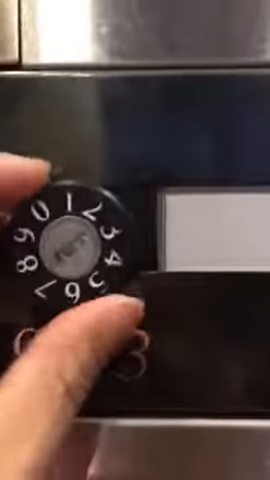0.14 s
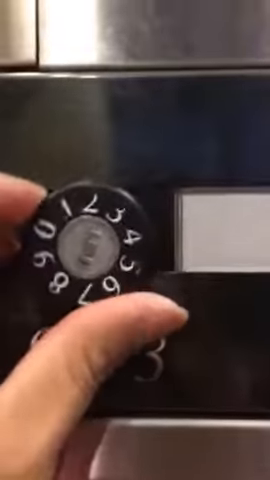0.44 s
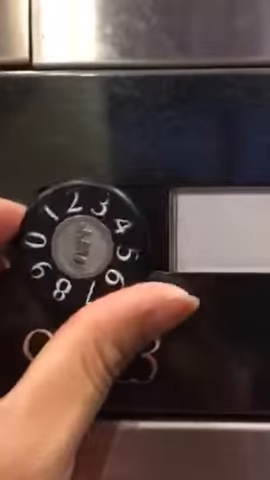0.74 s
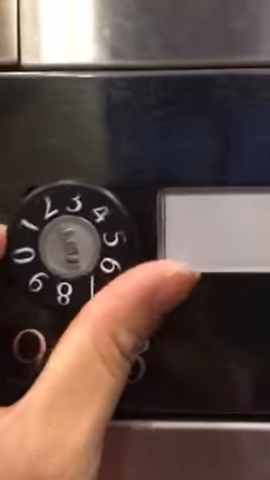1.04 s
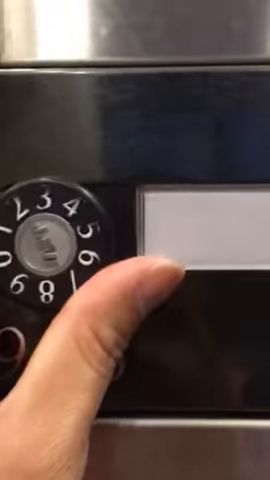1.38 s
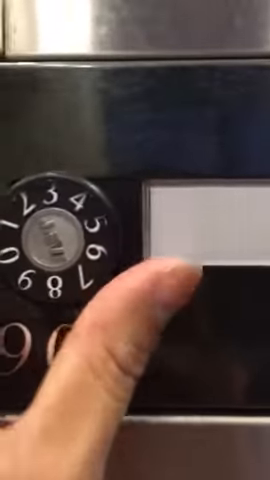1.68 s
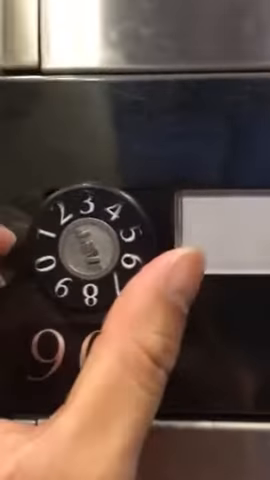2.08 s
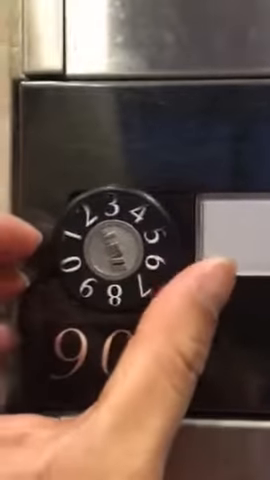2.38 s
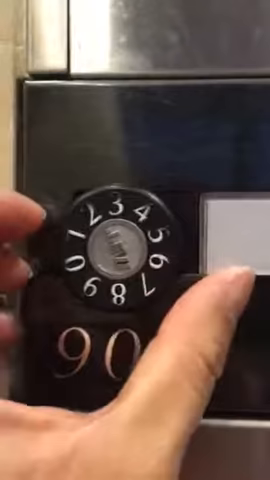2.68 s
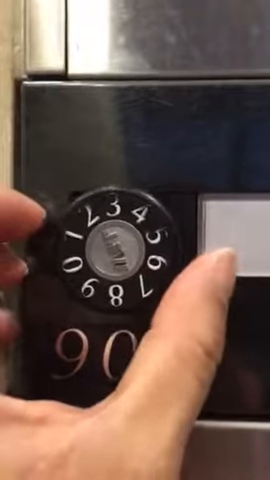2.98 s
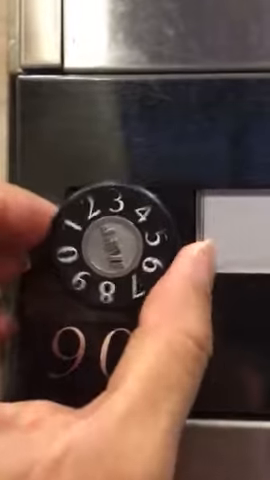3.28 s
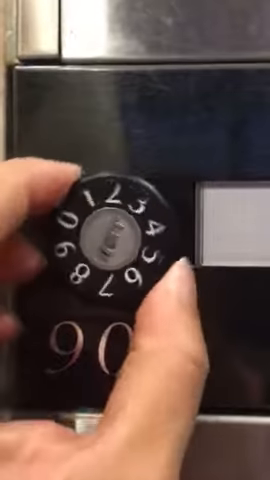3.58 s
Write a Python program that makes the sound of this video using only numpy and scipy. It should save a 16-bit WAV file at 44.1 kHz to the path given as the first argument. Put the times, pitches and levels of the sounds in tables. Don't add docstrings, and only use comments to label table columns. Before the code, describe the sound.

Close-up clicks of a dial lock on a sheet-metal door, strongest at the very start, each with a short metallic ring and faint echo; small ticks follow, then near silence and a final cluster over low room rumble.

```python
import sys
import numpy as np
from scipy import signal
from scipy.fft import rfft, irfft
from scipy.io import wavfile
from scipy.ndimage import uniform_filter1d

SR = 44100
rng = np.random.default_rng(int(sys.argv[2]) if len(sys.argv) > 2 else 0)


def gain_from_db(level_db):
    decades = np.asarray(level_db, float) / 20
    return 10 ** decades


def master_out(mix):
    frames = np.transpose(np.atleast_2d(mix))
    ceiling = np.clip(frames, -1, 1)
    pcm = np.round(ceiling * 32767).astype(np.int16)
    wavfile.write(sys.argv[1], SR, pcm)


N = 164493

# start_s, level_db, boom_db (door, re level), treble_db (re level), dial_pitch_hz
SNAPS = [
    (.0022, -30.5, -3, 3, 2160),
    (.5646, -35.5, 4.5, 9.5, 5500),
    (1.2151, -35.5, -3.5, 8.5, 5280),
]
# start_s, level_db, boom_db, treble_db, dial_pitch_hz
TICKS = [(0.2434, -54.5, -10, -26, 2400), (0.257, -55, -5, -30, 2710), (0.2935, -46, -19, -44, 2800),
         (0.315, -53, -5.5, -20, 4370), (0.3491, -40, -13.5, -35, 2636), (0.6345, -47, -19, -17, 4430),
         (0.7472, -40, -4, -15, 2770), (0.7876, -51, -9, -30, 2260), (1.2874, -47, -9, -15, 2600),
         (1.3413, -40.5, -35, -19, 2730), (1.5705, -53, -4.5, -19, 6500), (1.6196, -48, -11.5, -22, 4360),
         (3.3295, -36.5, -12, -19, 2830), (3.5875, -32.5, -15, -20, 4440), (3.6482, -45.5, -21, -24, 2760),
         (3.714, -49, -18, -27, 2630)]
SLIP_TIMES = [0, .078, .343, .5545, 1.2105, 3.582]
# level_db, boom_db, treble_db, dial_pitch_hz
SLIPS = [
    (-42, -15, -17, 2900),
    (-63, 9, -13, 3700),
    (-68, -4, 0, 12000),
    (-62.5, -3, -18, 4600),
    (-65, -2, -35, 2200),
    (-61, -8, -11, 5300),
]
# start_s, level_db, pitch_hz, t60_s
PINGS = [(.0023, -33, 4500, .02), (.0048, -29, 4310, .035), (.0058, -29, 2255, 0.065),
         (.0075, -33.5, 5900, .035), (.008, -31, 4000, 0.027), (.0085, -29, 13500, 0.033),
         (.0162, -36, 9700, 0.023), (.004, -42, 1572, 0.073), (.033, -46, 3640, 0.053),
         (0.565, -31.5, 5440, 0.02), (0.5647, -32.5, 1077, 0.064), (.566, -34, 2030, 0.057),
         (.5675, -38, 11900, .03), (.5665, -38, 15300, .025), (.5755, -41, 13600, .03),
         (.581, -42, 12200, .02), (.567, -40.5, 1574, .11), (.582, -44, 548, .09), (.5995, -47, 990, 0.11),
         (.7515, -50, 1540, 0.065), (0.757, -53, 2680, 0.045), (0.756, -54, 5200, 0.025),
         (0.7685, -46, 555, 0.075), (1.2155, -29, 5700, .02), (1.223, -36.5, 4250, 0.035),
         (1.2165, -37, 12880, 0.025), (1.2168, -39, 11890, .04), (1.217, -32, 4400, 0.037),
         (1.2172, -37, 3450, 0.089), (1.222, -46, 2580, 0.061), (1.2225, -36.5, 652, 0.055),
         (1.229, -43.5, 1620, 0.1), (1.236, -40.5, 977, 0.082), (1.3419, -54.5, 3240, 0.035),
         (1.343, -55, 2850, .04), (1.343, -54, 6000, .02), (1.5745, -51, 1070, 0.063),
         (1.62, -60, 3320, .03), (3.3285, -58, 4300, .04), (3.3312, -51, 2860, .015),
         (3.3325, -51, 5700, 0.016), (3.334, -52, 954, 0.056), (3.349, -58, 3380, .03),
         (3.5868, -46, 8300, 0.018), (3.587, -49.5, 2580, 0.064), (3.588, -44.5, 1230, 0.033),
         (3.588, -48.5, 5250, .04), (3.589, -47, 654, 0.057), (3.601, -49, 994, 0.074),
         (3.594, -55, 2570, .05)]
# start_s, level_db, pitch_hz
NAILS = [(0.5991, -43, 8400), (.7475, -55, 8600), (.7575, -54, 13000), (0.926, -66, 12000),
         (1.571, -59.5, 10100), (1.82, -68, 12000), (3.108, -68, 9450), (3.132, -63, 9450),
         (3.314, -67, 13000), (3.578, -57, 8600), (3.629, -60, 12900)]
# start_s, length_s, level_db
SCRAPES = [
    (0.228, .11, -73),
    (0.344, .045, -67),
    (1.572, .03, -69),
    (1.617, .04, -69),
    (3.329, 0.043, -64),
    (3.59, .04, -63),
]
# pitch_hz, level_db, t60_s
DOOR_MODES = [(532, 6, 0.088), (617, 8, 0.083), (818, 11, 0.049), (996, 4.5, 0.14), (1032, 8, 0.059),
              (1450, -34.5, 0.6), (1571, 7, 0.093), (1607, 5.5, 0.075), (2030, 7.5, 0.05), (2560, 3, 0.087),
              (2390, 7.5, 0.064), (2664, -7, 0.19), (3296, 4.5, 0.17), (3640, -11, 0.1)]
# pitch_hz, level_db, t60_s
LOCK_MODES = [(2010, -5, 0.16), (2677, 10, 0.059), (3010, 3.5, 0.085), (3310, 0, 0.19), (4020, 7, 0.094),
              (4360, 9.5, 0.071), (4500, -13, 0.097), (5060, -13, 0.05), (5300, -7, 0.093),
              (5700, -2, 0.094), (6080, 12, 0.068), (9700, -14, 0.1), (9910, -9, 0.14), (13830, -23, 0.064)]
# pitch_hz, level_db
CROWD_LEVEL = [(260, -28), (450, -6.5), (1530, 1.5), (1810, -2.5), (2360, 1.5), (5880, -4), (7810, -9.5),
               (13600, -8.5), (16000, -9)]
# pitch_hz, t60_s
CROWD_DECAY = [(500, 0.17), (1500, 0.16), (4000, 0.093), (8000, 0.083), (16000, 0.1)]
# pitch_hz, t60_s
HALL_DECAY = [(500, 0.097), (2000, 0.46), (6000, 0.42), (15000, 0.34)]
# pitch_hz, density_db (per Hz)
AIR_SPECTRUM = [(13, -45), (22, -6), (96, -1.5), (129, -7), (177, -2), (383, -15.5), (412, -20),
                (927, -31.5), (1800, -34), (2340, -42), (3960, -120)]
# pitch_hz, density_db (per Hz)
HISS_SPECTRUM = [(880, -45), (1500, -11), (1890, -8), (3070, -5.5), (4950, -14), (5640, -13),
                 (10200, -15.5), (15000, -13.5), (16200, -18)]
# pitch_hz, width_hz, lift_db
RESONANCES = [(45, 4.7, 10), (94.3, 12.4, 7), (180, 16, -4.5), (291, 18, 6), (409.7, 3.8, 12.5),
              (585, 120, 5.5), (1174, 355, 7), (4930, 120, -3), (7460, 680, -3), (10600, 300, -6)]
# start_s, level_db
HUM_LEVEL = [(0, -62.5), (1.0, -63.5), (2.0, -57), (2.6, -56.5), (3.1, -53), (3.73, -59)]
# start_s, level_db
TRAFFIC_LEVEL = [(0, -44.5), (.2, -53.5), (.45, -57.5), (1.0, -55.5), (1.7, -53.5), (1.9, -62), (2.3, -62),
                 (2.45, -54.5), (2.65, -60), (2.9, -45), (3.0, -46), (3.2, -48), (3.3, -57), (3.73, -57)]

NAMED_MODES = DOOR_MODES + LOCK_MODES
SNAP_SETTINGS = dict(dial_db=15, treble_hz=7500, chatter_s=0.003, rebound_db=-1.5)
TICK_SETTINGS = dict(dial_db=21.5, treble_hz=4970, chatter_s=0.0026, rebound_db=-5,
                     shift_db=(-14, 18.5, 16))
RING_DB, RING_OCTAVES = 4, 0.12
CRACK, CRACK_S = 0.71, 0.00027
NAMED_SPREAD_DB = 3
DIAL_OVERTONE, DIAL_OVERTONE_DB, DIAL_T60_S = 2.08, -10, 0.035
DOOR_DB, LOCK_DB = 5.5, -4
CROWD_LOW_DB, CROWD_LOW_HZ = -8, 2450
BOOM_RISE_S = 0.003
RATTLE_DB = 1.2
PING_RISE_TURNS, PING_TWIN, PING_DETUNE = 1.1, 0.32, 0.031
NAIL_T60_S, NAIL_OCTAVES = 0.0096, 0.35
SCRAPE_HZ, SCRAPE_OCTAVES, SCRAPE_GRAINS_PER_S = 2970, 1.1, 2500
HALL_DB, HALL_GAP_S, PING_HALL = -20.5, 0.011, 0.4
AIR_DB, AIR_CUT_HZ, HISS_DB = -52, 55, -73.5
PATCH_DB, SWELL_DB = 2.06, 1.06
HUM_HZ, HUM_WIDTH_HZ = 175.8, 15.5
TRAFFIC_HZ, TRAFFIC_WIDTH_HZ, TRAFFIC_STEADY = 48.5, 10, 0.4
TRAFFIC_OVERTONE_DB = -10


def evened(x):
    return x / np.sqrt(np.mean(x ** 2) + 1e-20)


def read(points, hz):
    f, value = np.transpose(points)
    return np.interp(np.log(hz + 1), np.log(f + 1), value)


def add(mix, s, sound):
    part = mix[max(round(s * SR), 0):][:len(sound)]
    part += sound[:len(part)]


def narrowband(centre_hz, width_hz):
    hz = np.fft.rfftfreq(N, 1 / SR)
    return irfft(rfft(rng.standard_normal(N)) * np.exp(-((hz - centre_hz) / width_hz) ** 2), N)


def level_curve(points):
    return gain_from_db(np.interp(np.arange(N) / SR, *np.transpose(points)))


def door_modes(count=900):
    crowd_hz = np.linspace(450, 16400, count) + rng.uniform(-9, 9, count)
    crowd_db = read(CROWD_LEVEL, crowd_hz) + CROWD_LOW_DB / (1 + (crowd_hz / CROWD_LOW_HZ) ** 4)
    crowd_t60 = read(CROWD_DECAY, crowd_hz) * rng.uniform(0.63, 1.21, count)
    named_hz, named_db, named_t60 = np.transpose(NAMED_MODES)
    named_db = named_db + DOOR_DB + LOCK_DB * (named_hz > 2600)
    hz = np.r_[named_hz, crowd_hz]
    db = np.r_[named_db, crowd_db]
    t60 = np.r_[named_t60, crowd_t60]
    t = np.arange(SR // 7) / SR
    rise = 1 - np.exp(-t / (BOOM_RISE_S * (1000 / hz) ** 2)[:, None])
    decay = gain_from_db(-60 * t / t60[:, None])
    return hz, db, rise * decay * np.sin(2 * np.pi * hz[:, None] * t)


def dial_ring(hz, z):
    t = np.arange(SR // 14) / SR

    def pair(f, a, b):
        upper = np.sin(2 * np.pi * f * (1 + 0.023 * a) * t)
        lower = np.sin(2 * np.pi * f * (0.96 + 0.021 * b) * t)
        return upper + 0.51 * lower

    overtone = gain_from_db(DIAL_OVERTONE_DB) * pair(hz * DIAL_OVERTONE, z[2], z[3]) * (hz < 7500)
    envelope = gain_from_db(-60 * t / DIAL_T60_S) * np.minimum(t / 0.0012, 1)
    return envelope * (pair(hz, z[0], z[1]) + overtone)


def strikes(rows, modes, dial_db, treble_hz, chatter_s, rebound_db, shift_db=(0, 0, 0), count=5):
    hz, db, shapes = modes
    named = len(NAMED_MODES)
    out = np.zeros(N)
    luck = rng.standard_normal((len(rows), count, len(hz) + 1))
    crack = 1 + CRACK * np.exp(-np.arange(shapes.shape[1]) / SR / CRACK_S)
    low = 1 / (1 + (hz / 1700) ** 6)
    high = 1 / (1 + (treble_hz / hz) ** 4)
    first = (np.arange(count) == 0)[:, None]
    for (s, level_db, boom_db, treble_db, ring_hz), z in zip(rows, luck):
        level = gain_from_db(level_db + shift_db[0])
        colour = db + low * (boom_db + shift_db[1]) + high * (treble_db + shift_db[2])
        colour += RING_DB * np.exp(-(np.log2(hz / ring_hz) / RING_OCTAVES) ** 2)
        spread = gain_from_db(NAMED_SPREAD_DB * np.tanh(z[:, -named:]))
        named_share = np.sign(z[:, 1:named + 1]) * spread * first
        share = np.c_[named_share, z[:, named + 1:]]
        gaps = (1 + 0.4 * np.tanh(z[1:, 0])) * chatter_s / 3
        when = np.r_[0, np.cumsum(gaps)]
        force = gain_from_db(rebound_db * (when > 0)) * np.exp(-when / chatter_s)
        add(out, s, level * gain_from_db(dial_db) * dial_ring(ring_hz, z[:4, -1]) / 10)
        rebounds = (force[:, None] * share * gain_from_db(colour)) @ shapes
        for late, sound in zip(when, rebounds):
            add(out, s + late, level * crack * sound / 10)
    return out


def rattled(x):
    flutter = uniform_filter1d(rng.standard_normal(N), size=50)
    flutter = evened(uniform_filter1d(flutter, size=50))
    return x * gain_from_db(RATTLE_DB * flutter)


def pings():
    out, t = np.zeros(N), np.arange(SR // 6) / SR
    for (s, db, hz, t60), z in zip(PINGS, rng.uniform(-0.96, 1, (len(PINGS), 2))):
        twin_hz = hz * (1 + PING_DETUNE * z[0])
        ring = np.sin(2 * np.pi * hz * t)
        ring += PING_TWIN * np.sin(2 * np.pi * twin_hz * t + np.pi * z[1])
        rise = np.minimum(t * hz / PING_RISE_TURNS, 1)
        add(out, s, gain_from_db(db - 60 * t / t60) * rise * ring)
    return out


def nails():
    out, t = np.zeros(N), np.arange(1024) / SR
    hz = np.fft.rfftfreq(1024, 1 / SR) + 1
    for (s, db, pitch_hz), z in zip(NAILS, rng.standard_normal((len(NAILS), 1024))):
        band = irfft(rfft(z) * np.exp(-(np.log2(hz / pitch_hz) / NAIL_OCTAVES) ** 2))
        add(out, s, evened(band) * gain_from_db(db - 60 * t / NAIL_T60_S) * np.minimum(t / 0.00011, 1))
    return out


def scrapes():
    hz, t = np.fft.rfftfreq(N, 1 / SR) + 1, np.arange(N) / SR
    grains = rng.standard_normal(N) * (rng.random(N) < SCRAPE_GRAINS_PER_S / SR)
    shape = np.exp(-(np.log2(hz / SCRAPE_HZ) / SCRAPE_OCTAVES) ** 2)
    band = evened(irfft(rfft(grains) * shape, N))
    level = np.zeros(N)
    for s, length, db in SCRAPES:
        level += gain_from_db(db) * np.sin(np.pi * np.sqrt(np.clip((t - s) / length, 0, 1)))
    return band * level


def hall(x):
    taps = np.zeros(SR // 2)
    at = np.arange(0, SR // 2 - 12, 12)
    taps[at + rng.integers(0, 12, len(at))] = rng.choice([-1., 1.], len(at))
    hz, t, z = signal.stft(taps, SR, nperseg=256)
    decay = gain_from_db(-60 * t / read(HALL_DECAY, hz)[:, None])
    tail = signal.istft(z * decay, SR, nperseg=256)[1]
    tail = np.r_[np.zeros(int(HALL_GAP_S * SR)), tail / np.linalg.norm(tail)]
    return signal.fftconvolve(x, tail)[:N]


def room_tone():
    frames, hz = N // 1024 + 5, np.fft.rfftfreq(4096, 1 / SR)
    a, b, patches = rng.standard_normal((frames, 2049, 3)).T
    patches = uniform_filter1d(patches, size=12, axis=0)
    patches = evened(uniform_filter1d(patches, size=4, axis=1))
    swell = evened(uniform_filter1d(rng.standard_normal(frames), size=12))
    lift = sum(db * np.exp(-((hz - f) / w) ** 2) for f, w, db in RESONANCES)
    z = (a + 1j * b) * gain_from_db(lift[:, None] + SWELL_DB * swell)
    split = 1 / (1 + (hz / 1700) ** 8)
    air_shape = gain_from_db(read(AIR_SPECTRUM, hz)) * np.sqrt(split) * np.minimum(hz / AIR_CUT_HZ, 1) ** 3
    hiss_shape = gain_from_db(read(HISS_SPECTRUM, hz)) * np.sqrt(1 - split)

    def sounded(v):
        return evened(signal.istft(v, nperseg=4096, noverlap=3072)[1][2048:N + 2048])

    air = sounded(z * gain_from_db(PATCH_DB * patches) * air_shape[:, None])
    hiss = sounded(z * hiss_shape[:, None])
    return gain_from_db(AIR_DB) * air + gain_from_db(HISS_DB) * hiss


def hum():
    tone = narrowband(HUM_HZ, HUM_WIDTH_HZ)
    tone = tone / np.sqrt(uniform_filter1d(abs(signal.hilbert(tone)), size=4000))
    return evened(tone) * level_curve(HUM_LEVEL)


def traffic():
    drone = signal.hilbert(narrowband(TRAFFIC_HZ, TRAFFIC_WIDTH_HZ))
    flutter = uniform_filter1d(abs(drone), size=3000)
    tone = drone / flutter ** TRAFFIC_STEADY
    overtone = (tone ** 2 / abs(tone)).real
    return evened(tone.real + gain_from_db(TRAFFIC_OVERTONE_DB) * overtone) * level_curve(TRAFFIC_LEVEL)


def scene():
    modes = door_modes()
    dial = strikes(SNAPS, modes, **SNAP_SETTINGS)
    dial += strikes(TICKS, modes, **TICK_SETTINGS)
    dial += strikes(np.c_[SLIP_TIMES, SLIPS], modes, **SNAP_SETTINGS)
    dial += nails()
    parts = pings()
    echo = gain_from_db(HALL_DB) * hall(dial + PING_HALL * parts)
    background = room_tone() + hum() + traffic()
    return (rattled(dial) + parts + scrapes() + echo + background)[None]


def low_pass(x):
    return signal.sosfilt(signal.butter(12, 16820, fs=SR, output="sos"), x)


def record(dry):
    edge = signal.firwin(255, 15840, window=("kaiser", 8), fs=SR)
    mix = signal.oaconvolve(dry, edge[None], "same")
    return low_pass(mix)


dry = scene()
out = record(dry)
master_out(out)
```